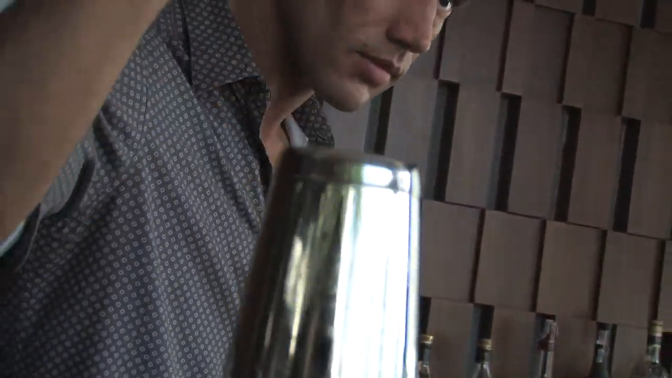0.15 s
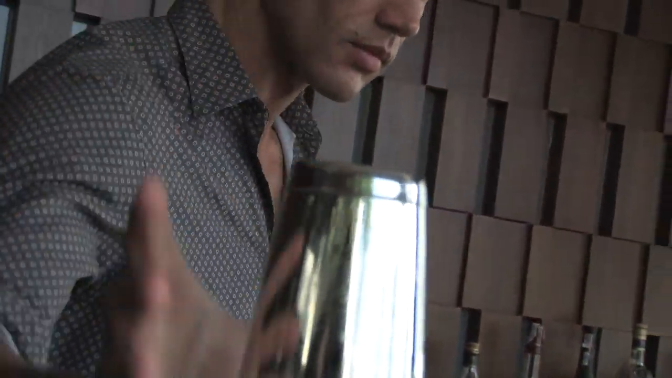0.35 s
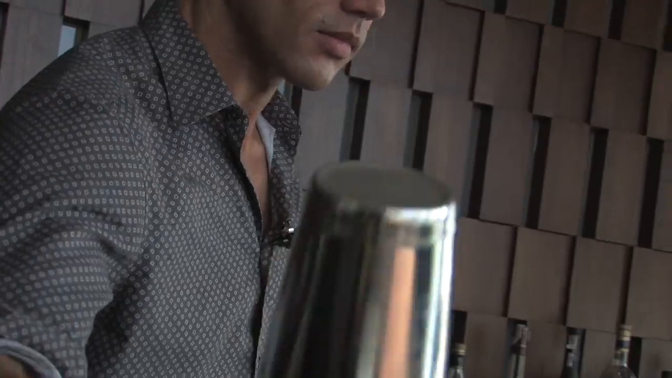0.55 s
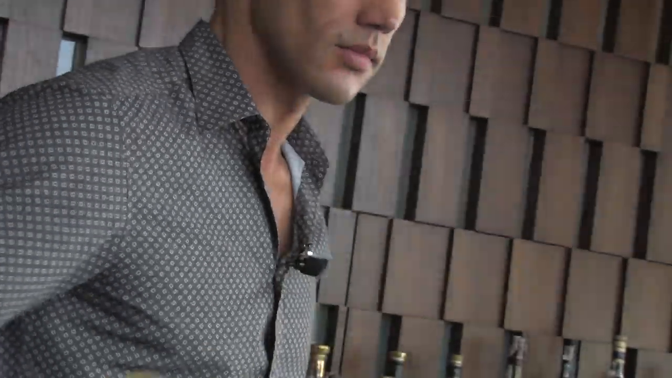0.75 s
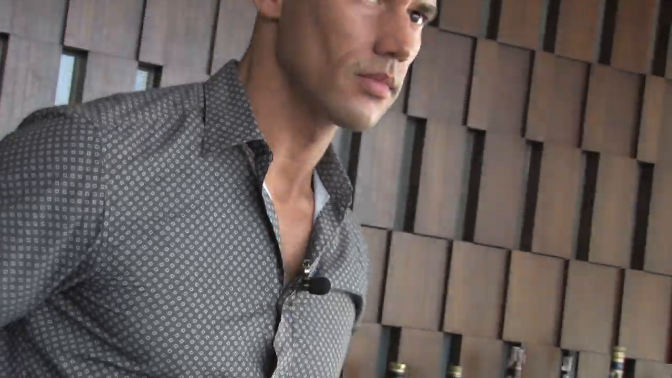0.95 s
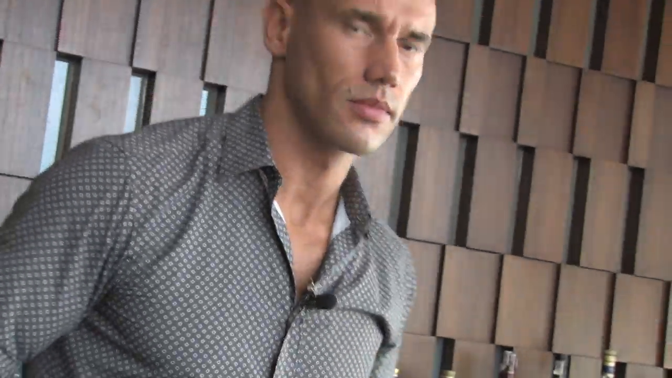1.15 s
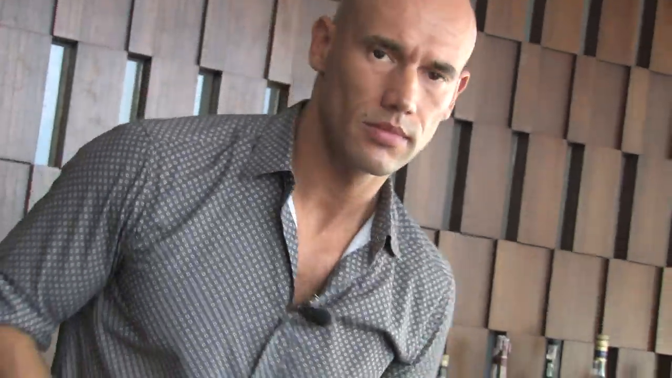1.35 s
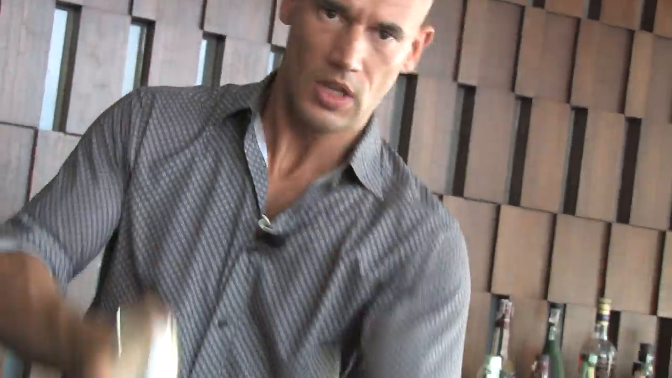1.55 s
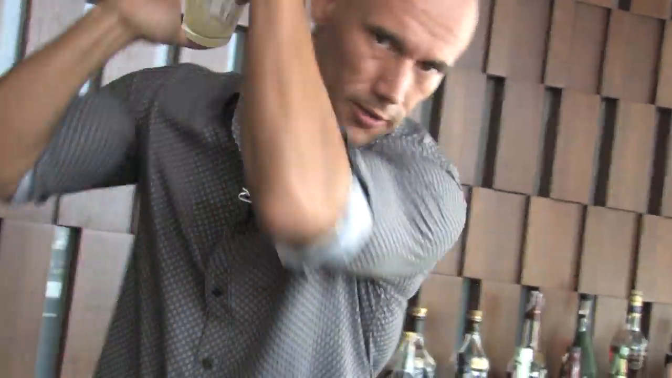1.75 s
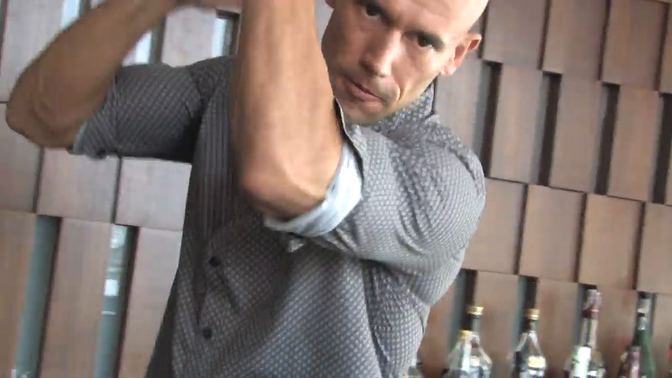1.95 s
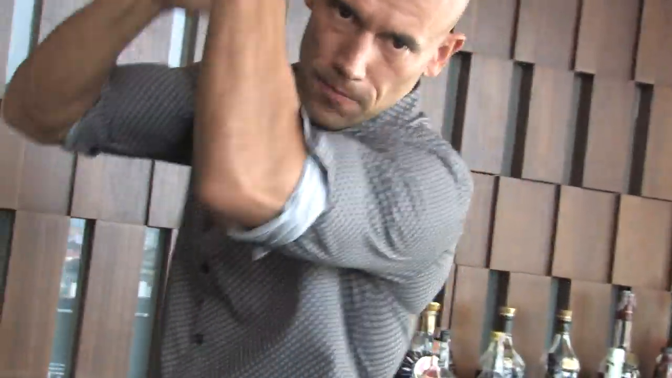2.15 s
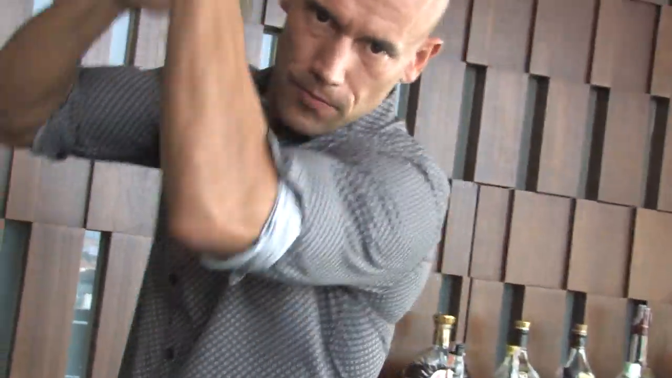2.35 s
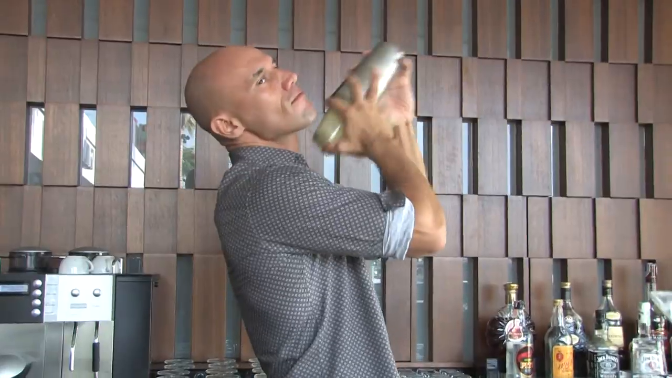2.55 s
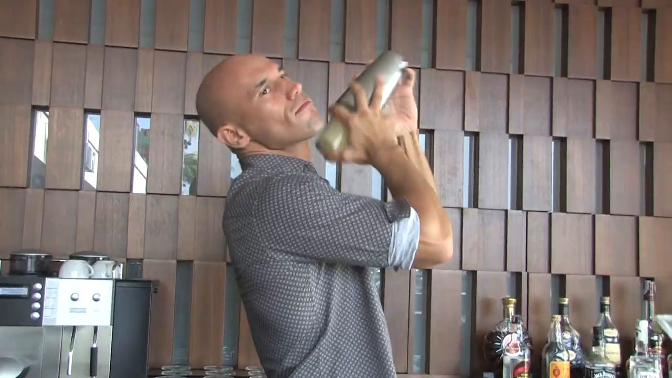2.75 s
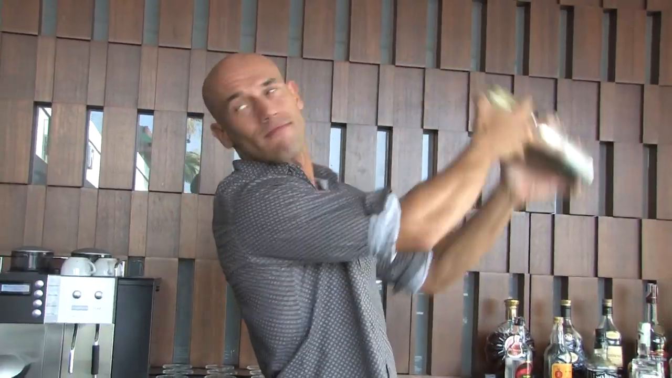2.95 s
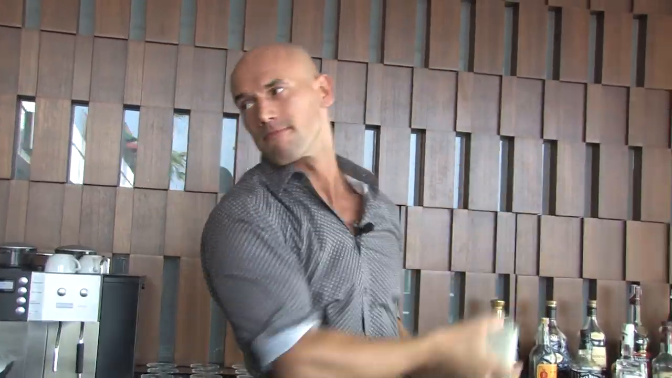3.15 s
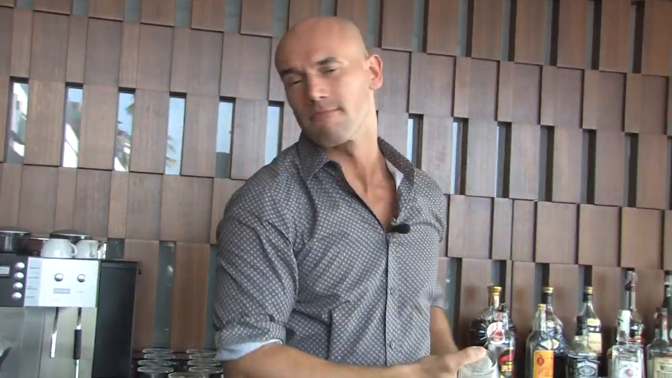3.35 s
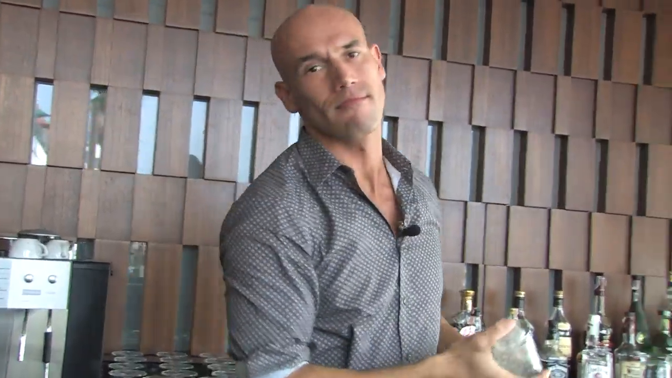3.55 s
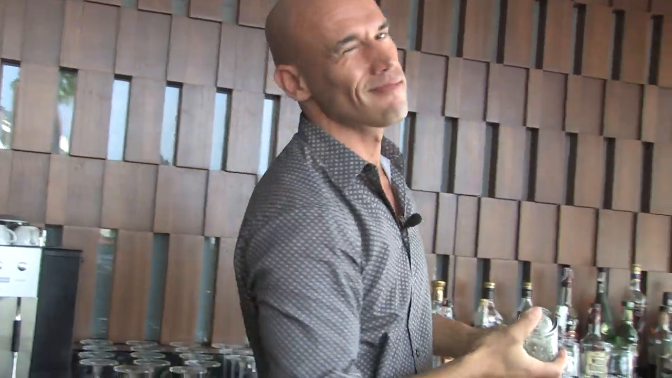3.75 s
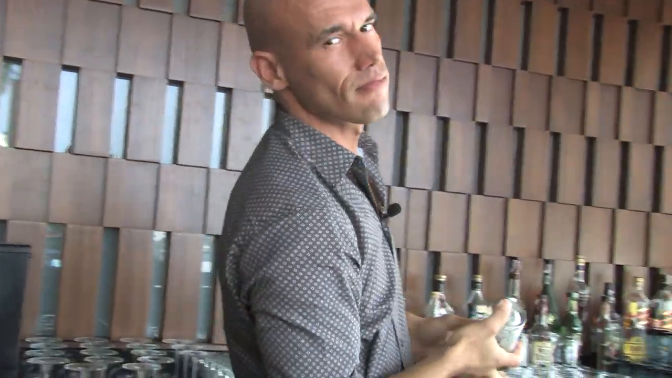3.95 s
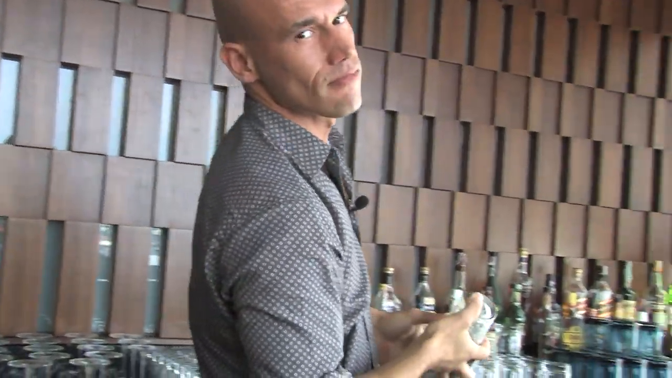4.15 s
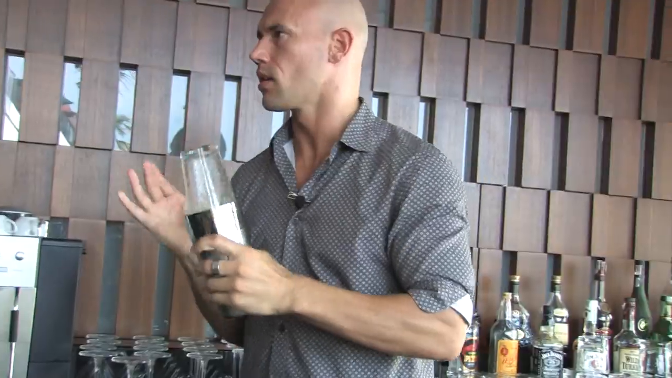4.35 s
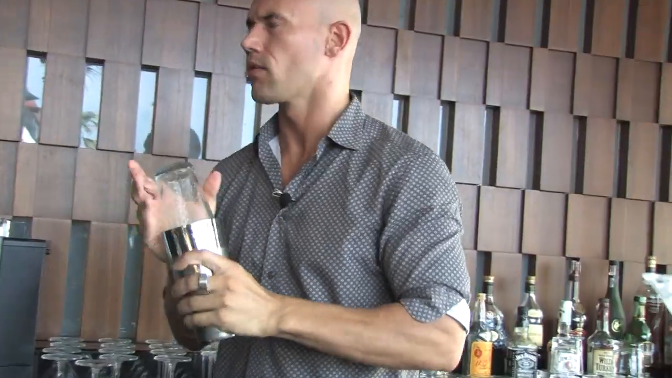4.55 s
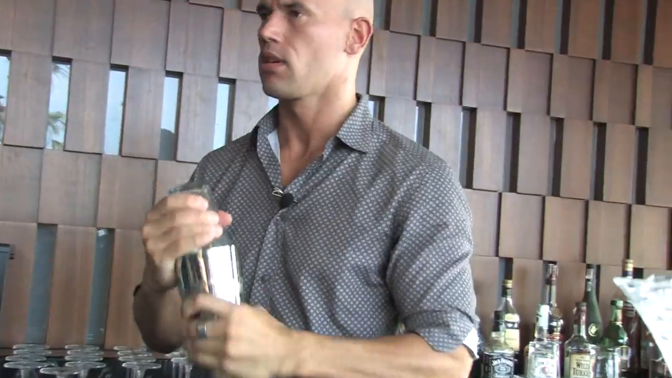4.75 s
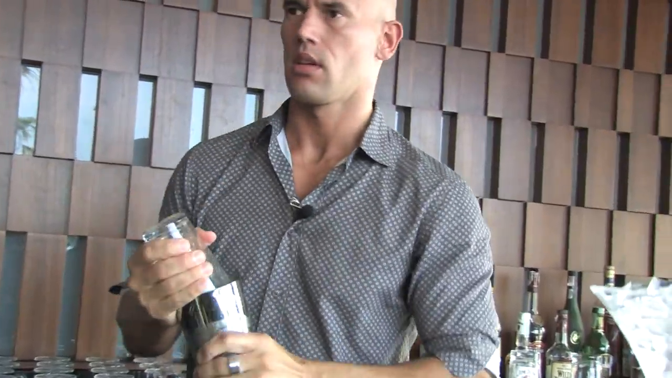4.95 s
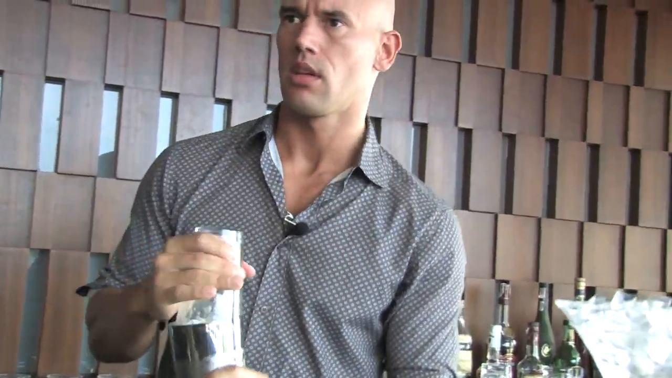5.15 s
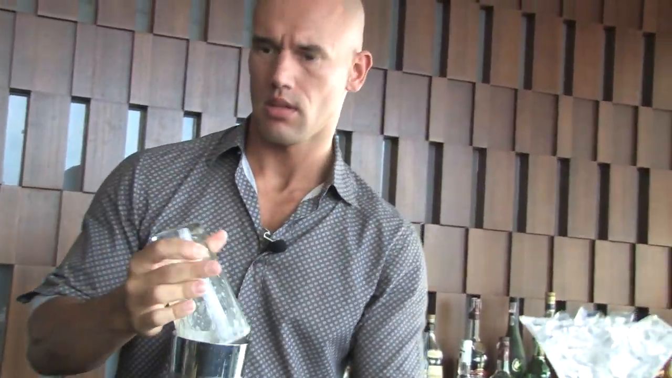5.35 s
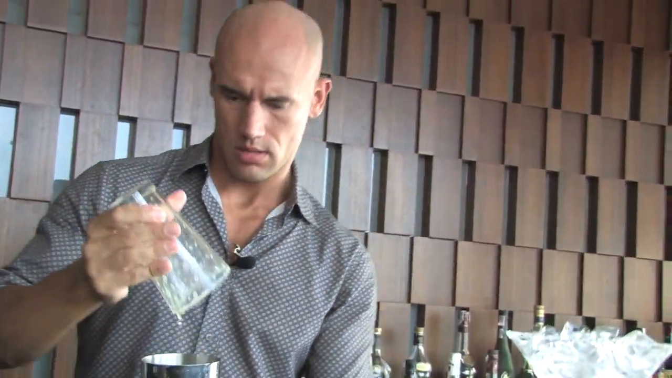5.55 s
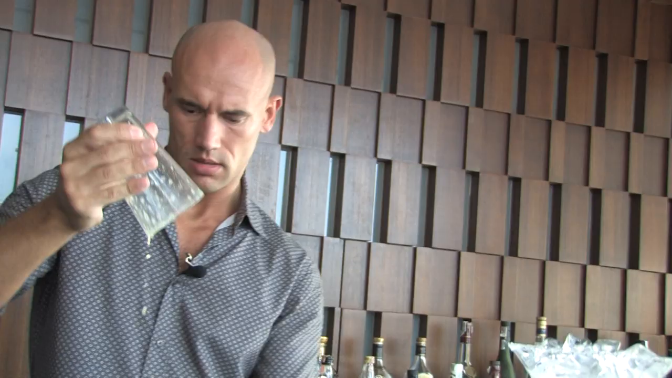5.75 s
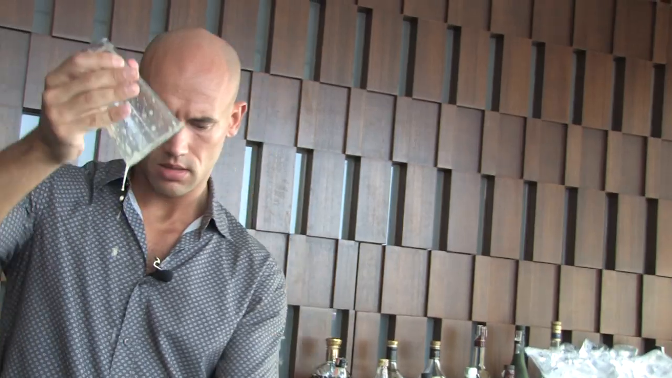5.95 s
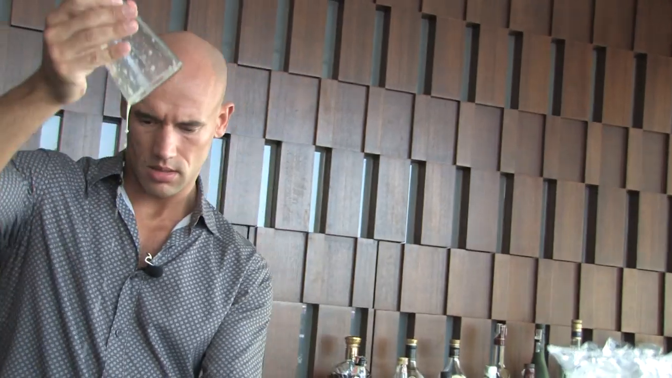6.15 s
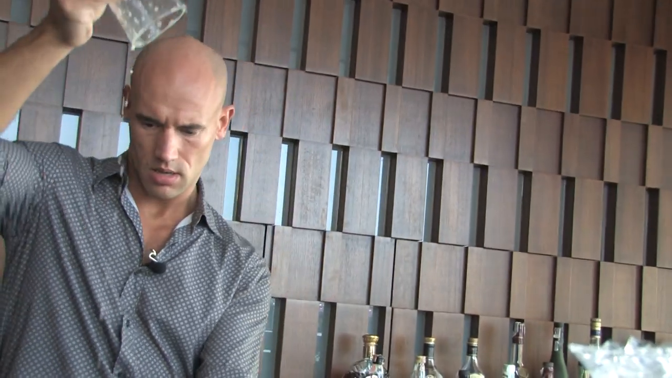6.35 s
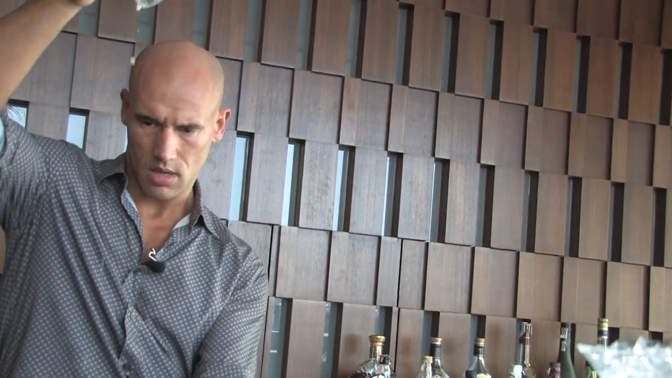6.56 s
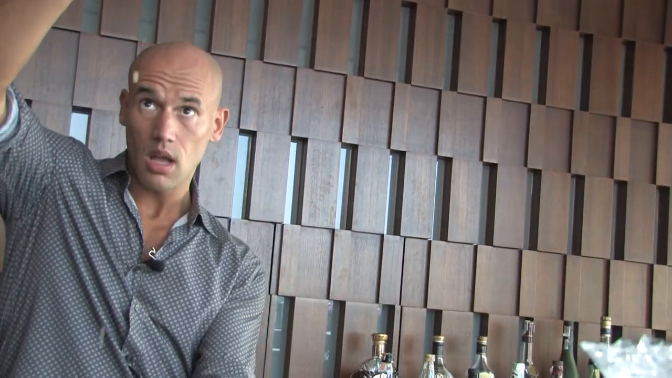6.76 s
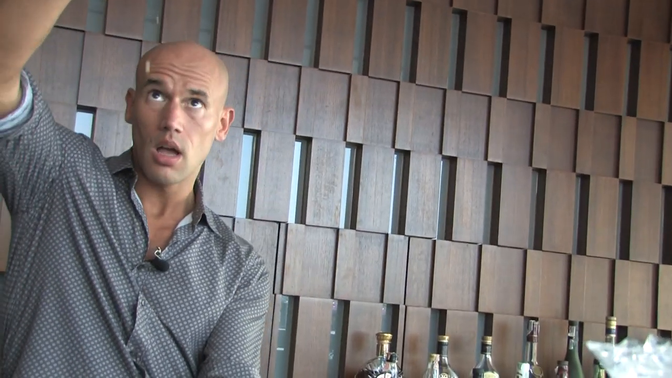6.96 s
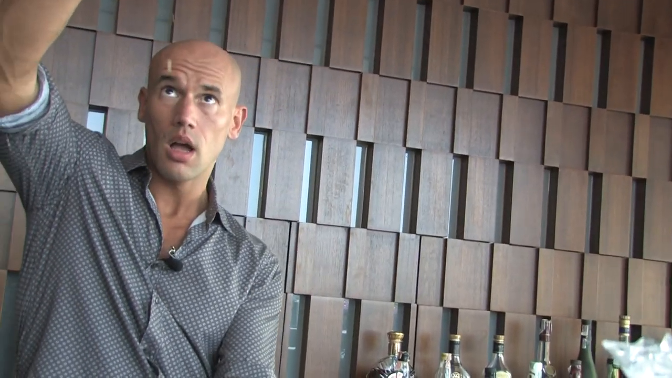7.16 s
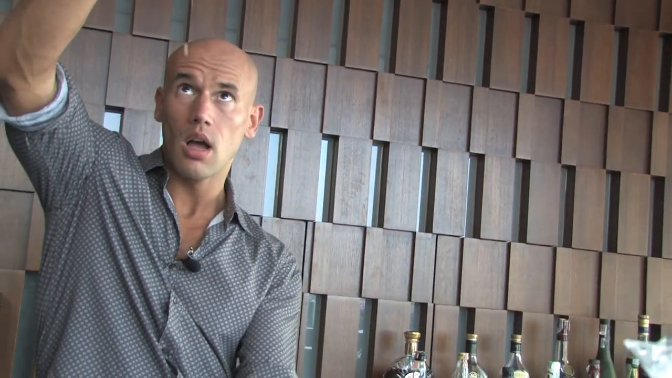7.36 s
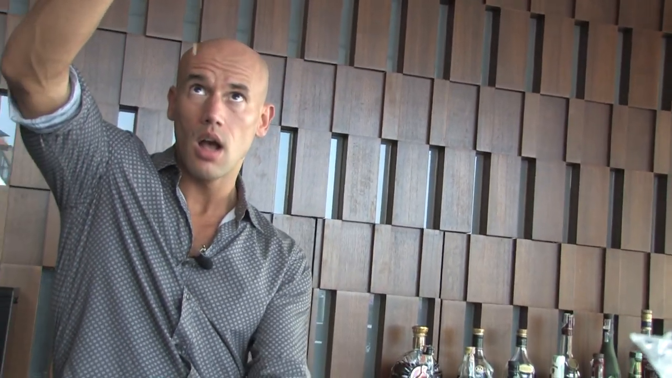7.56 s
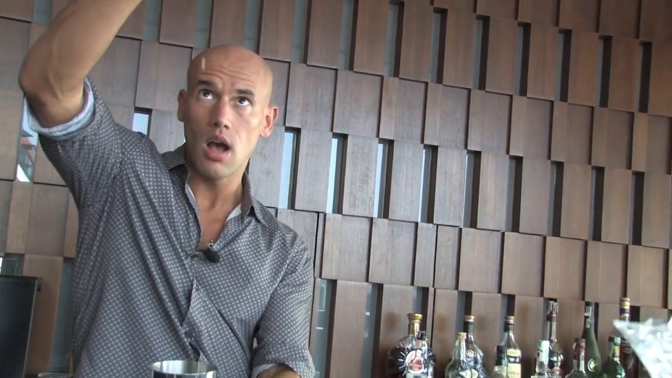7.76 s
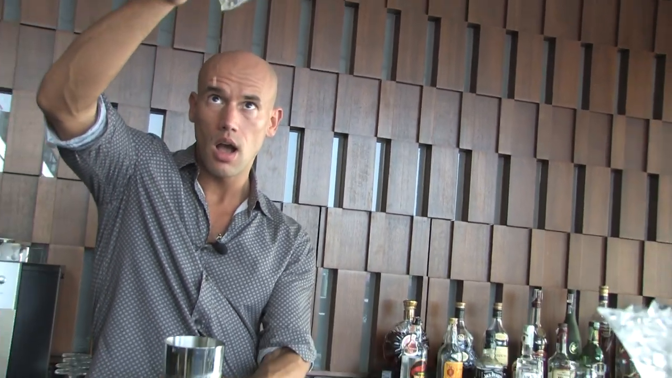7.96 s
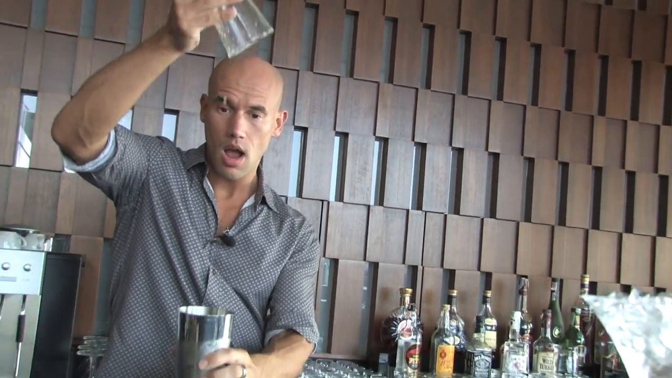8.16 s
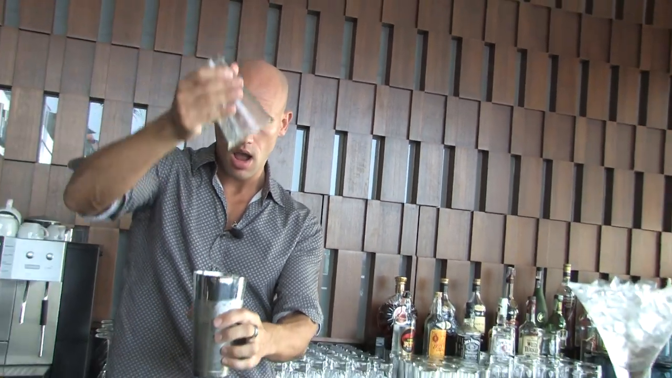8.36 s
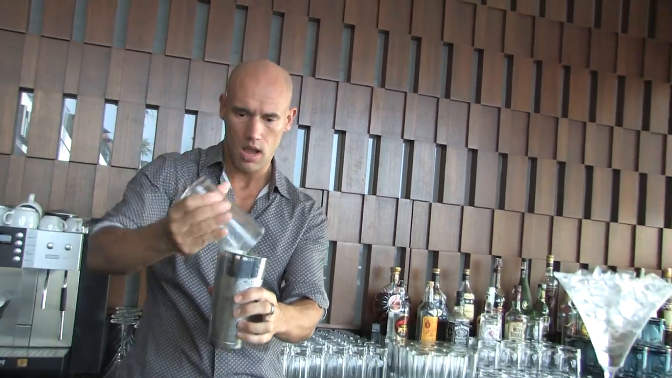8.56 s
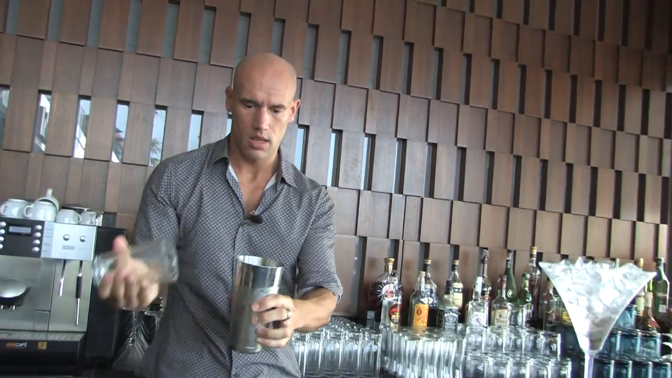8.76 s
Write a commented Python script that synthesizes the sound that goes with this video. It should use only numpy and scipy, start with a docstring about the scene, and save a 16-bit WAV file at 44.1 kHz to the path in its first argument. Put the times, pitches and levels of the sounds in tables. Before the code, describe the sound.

Ringing slap on a shaker, a swish of ice, a few tumbling cubes and clicks, then about a dozen rapid ice strokes with low cloth bumps at the microphone. Midway everything turns quieter and duller. A distorted blow opens the seal, bits of ice tick on steel, a thin pour fades in the short-echo bar, and a glass lands hard on wood.

```python
"""Bar counter, microphone on the shirt, steel shaker close by: a bartender slaps a glass into a tin,
shakes the ice, knocks the seal open and pours; the glass clinks on the tin and is set down hard.
Ice is streams of short noise cracks and steel modes; slaps, snaps and clinks are noise and dying modes;
the pour is bubble tones. Cloth bumps and rumble, bar hiss, faint whistles and a short room lie behind.
One stretch is suddenly softer and duller; the loudest blows overload the microphone input."""
import sys
import numpy as np
from scipy import signal
from scipy.fft import rfft, irfft
from scipy.io import wavfile
from scipy.ndimage import uniform_filter1d

SR = 44100
rng = np.random.default_rng(int(sys.argv[2]) if len(sys.argv) > 2 else 0)


def output_pcm(signal):
    """Save a mono or channel-first signal as 16-bit PCM at the path in sys.argv[1].

    Samples are clipped to [-1, 1] before scaling.
    """
    pcm = np.clip(np.atleast_2d(signal).T, -1, 1) * 32767
    wavfile.write(sys.argv[1], SR, np.round(pcm).astype(np.int16))


N = 392116
TIME = np.arange(N) / SR  # seconds into the scene
AGE = np.arange(SR // 3) / SR  # seconds since a contact

# Event levels hold ahead of the quiet stretch and the overload; mode and colour levels are relative.

# steady bar hiss: pitch_hz, level_db (per Hz)
HISS_COLOUR = [(15, -30.5), (25, -9.5), (48, -6.5), (149, 0.5), (317, -8.5), (560, -7.5), (1400, -14),
               (2610, -16), (3820, -20.5), (7710, -21), (14800, -24), (16000, -25)]
HISS_DB = -49.5
# how long the room rings: pitch_hz, t60_s
ROOM_T60 = [(200, 0.063), (3000, 0.44), (8000, 0.39), (16000, 0.2)]
# faint thin whistles: start_s, length_s, start_hz, end_hz, level_db
WHISTLES = [(0.08, 0.13, 9300, 8900, -44.5), (1.501, 0.13, 9400, 8100, -43), (5.08, 0.23, 1050, 995, -49),
            (5.386, 0.2, 1120, 926, -52), (5.67, 0.176, 790, 775, -53.5), (6.22, 0.43, 3560, 3490, -55),
            (6.37, 0.16, 3190, 3160, -51)]

# microphone bumps on the shirt: start_s, peak_db, pitch_hz, time_to_peak_s
BUMPS = [(.008, -22, 208, 0.0071), (0.856, -27, 73, 0.0086), (1.213, -29, 117, 0.013),
         (1.648, -21.5, 64.5, 0.0066), (1.848, -21, 93, 0.0073), (1.9699, -7, 157, 0.0016),
         (1.973, -4.5, 68.8, 0.0055), (2.022, -16, 62.6, 0.017), (2.19, -15.5, 67.4, .012),
         (2.416, -9, 67.6, 0.0057), (4.585, -1, 125, 0.0042), (5.805, -24, 38.8, .011),
         (5.916, -23.5, 171, 0.00086), (5.993, -24.5, 150, 0.0018), (6.661, -26, 77.8, 0.0075),
         (6.939, -27, 86, 0.015)]
# arm moves dragging cloth over the microphone: peak_s, level_db, rise_s, t60_s
MOVES = [(.02, -28.5, 0.59, 0.53), (.9, -40, 0.33, 0.44), (1.35, -40.5, 1.9, 1.7), (2.0, -24.5, 1.15, 1.87),
         (3.3, -31, .9, 0.63), (4.54, -36.5, 0.23, 0.48), (6.95, -52, 4.1, 0.56), (8.6, -53.5, 1.1, 4)]
# cloth rumble: pitch_hz, level_db (per Hz)
RUMBLE_COLOUR = [(15, -15), (45, 1.5), (90, -3.5), (180, -14), (400, -23.5), (1000, -43), (4000, -86.5)]
CLOTH_REST_DB = -62  # the shirt is never quite still

# the drink gulps as the shaker is jolted or turned over: peak_s, level_db
GULPS = [(0.153, -42), (1.036, -31), (1.054, -29.5), (1.109, -29.5), (1.15, -34.5)]
# air pocket in the shaker: pitch_hz, width_hz, level_db
AIR_POCKET = [(460, 130, -8), (600, 75, 0), (910, 160, -11), (1550, 600, -15)]
# drink splashing on the wall: pitch_hz, level_db (per Hz)
SPLASH_COLOUR = [(150, -27), (400, -13), (750, -4), (1200, -1), (1650, 2), (2100, -3), (3000, -14),
                 (16000, -50)]
GULP_RISE_S, GULP_T60, GULP_SPLASH_DB, SPRAY_RISE_S = .008, .3, -6, .13
# the drink runs into the tin: a first gush that thins to a trickle
POUR_S, POUR_DB, POUR_RISE_S, POUR_T60 = 5.68, -57, 1.2, 3

# the glass is struck: start_s, level_db, favoured_hz, tick_db
CLINKS = [(5.3793, -26, 2820, -26), (5.3909, -22, 4830, -22.5), (8.7238, -4.5, 2300, -9.5),
          (8.7402, -40, 2500, -17), (8.83, -28.5, 4970, -33.5)]
# mixing glass modes: pitch_hz, level_db, t60_s
GLASS_MODES = [(2229, -8, .05), (2313, -3, .082), (5005, -8, .085), (6200, -6, .035), (7060, -13, .07),
               (8390, 4.5, .036)]
# wooden counter modes under the glass: pitch_hz, level_db, t60_s
COUNTER_MODES = [(296, -11, .07), (540, -1, .06), (565, -31, .25), (595, -9, .058), (820, -19, .07),
                 (1180, -19, .03), (1670, -19, .045)]
KNOCK_S = 8.7245
WOBBLE_S, WOBBLE_DB, WOBBLE_RISE_S, WOBBLE_T60 = 8.838, -42, 0.049, .55

# the rim snaps in its seat: start_s, level_db, centre_hz, t60_s, rim_ring_db (relative to level_db)
SNAPS = [(1.199, -7, 4570, 0.0096, -7.5), (1.362, -15, 6800, 0.022, -22), (4.412, -27.5, 4500, 0.046, -13),
         (4.421, -28.5, 2640, .01, 4), (4.574, -19.5, 5000, 0.0096, -7.5), (4.585, -6, 7200, .0074, -31),
         (4.923, -9, 2740, 0.009, -1), (4.9484, -19, 3250, 0.0083, -20), (4.979, -28, 2950, 0.035, 0.5),
         (5.084, -18, 2760, 0.029, 5.5)]
# rim pinched by the glass: pitch_hz, level_db, t60_s
RIM_MODES = [(1390, -8, .03), (2230, -1, .018), (2420, 0, .02), (3250, -3, .016)]

# the palm strikes the shaker: start_s, level_db, crash_t60_s, ring_db, spared_hz (not boosted)
SLAPS = [(.007, -12.5, 0.058, -20.5, 2540), (.022, -19, 0.23, -22, 2100), (4.591, 0.5, 0.053, -31.5, 3700)]
# crash of a slap: pitch_hz, level_db (per Hz)
CRASH_COLOUR = [(80, -11.5), (300, 1), (800, -3), (1500, -5.5), (2600, 6), (3600, 1), (4600, -6),
                (7200, -3), (10500, -12), (13000, -29), (16000, -32)]
# tin ringing freely: pitch_hz, level_db, t60_s
TIN_MODES = [(2042, -4, .42), (2525, -9, .2), (2620, 10, .026), (2690, -8, .2), (3510, -12, .28),
             (4550, -18, .3), (5740, -18, .42), (6330, -17, .2), (6915, -13, .24), (10840, -18, .11)]

# rushing ice: pitch_hz, level_db (per Hz)
RUSHING_COLOUR = [(410, -48.5), (700, -33.5), (1500, -22), (1780, -13.5), (2130, -5), (2880, -12),
                  (3290, 0), (3740, -12.5), (4260, -10), (5470, -17), (7390, -12), (16000, -44)]
# crushed ice pours from one end to the other as the shaker is turned over
RUSH_S, RUSH_HOLD_S, RUSH_DB, RUSH_RISE_S, RUSH_T60 = 0.84, 0.046, -22, 0.1, 0.41
# stray bits run ahead of it and trail behind; level relative to the rush
STRAGGLE_DB, STRAGGLE_RISE_S, STRAGGLE_T60 = -13, 0.45, 1.1
# the last cubes settle in ticks that die down to a faint remainder
SETTLE_S, SETTLE_DB, SETTLE_RISE_S, SETTLE_T60, LAST_TICKS_DB = 3.45, -34, 0.53, 0.32, -57
# ice slides along the tin as the glass is worked loose and lifted: peak_s, level_db, rise_s, t60_s
SLIDES = [(4.415, -35, 0.043, 0.41), (4.47, -40.5, .1, 0.16), (4.6, -10.5, 0.073, 0.194),
          (4.68, -43, .3, 0.63), (4.895, -35, 0.32, 0.27), (5.09, -39, 0.22, 0.23),
          (5.152, -36, 0.22, 0.23)]
# ice sliding on steel: pitch_hz, level_db (per Hz)
SLIDING_COLOUR = [(350, -35.5), (670, -24.5), (1200, -9.5), (1830, 4.5), (2310, 6.5), (3680, -6),
                  (4650, -11), (6200, -0.5), (12000, -19.5), (16000, -34.5)]
# bits of ice drop in the opened tin: start_s, peak_db, favoured_hz
BITS = [(4.433, -25, 3400), (4.557, -22.5, 3300), (4.7915, -26, 2500), (4.8752, -29, 3150),
        (5.035, -27.5, 2450), (5.0706, -21, 2140), (5.1304, -24, 3210), (5.1536, -20, 3070),
        (5.2962, -30, 3400)]
# steel wall under a light tick: pitch_hz, level_db, t60_s
WALL_MODES = [(2400, -2, .013), (3050, -1, .011), (3450, 2, .012), (3840, -5, .008), (4575, -4, .012),
              (7500, -12, .008)]

# a few cubes tumble as the shaker is turned and raised: peak_s, level_db
TUMBLES = [(1.135, -29.5), (1.207, -21.5), (1.25, -31), (1.304, -30.5), (1.374, -28.5), (1.578, -39.5),
           (1.84, -38.5), (1.86, -33.5), (1.9, -22)]
TUMBLE_RISE_S, TUMBLE_T60 = .09, 0.33
TUMBLE_CUBES_DB, TUMBLE_CHIPS_DB, TUMBLE_SPLASH_DB = -5, -7, -12  # what a tumble is made of
# the ice hits an end of the shaker:
# middle_s, cubes_db, spread_s (standard deviation), splash_db, chips_db, cubes_lower_edge_hz
STROKES = [(1.962, -11, 0.027, -25, -29, 800), (2.061, -6.5, 0.017, -19.5, -16.5, 450),
           (2.149, -11, 0.028, -24, -23.5, 1000), (2.255, -8.5, 0.022, -21.5, -26, 550),
           (2.329, -11.5, 0.011, -22.5, -23, 695), (2.373, -8.5, 0.013, -26.5, -19.5, 1200),
           (2.454, -11, 0.02, -19, -18.5, 449), (2.534, -15, 0.0084, -30.5, -22.5, 800),
           (2.617, -14.5, 0.023, -39, -27, 800), (2.728, -15, 0.029, -36, -22, 1500),
           (2.849, -18, 0.024, -32.5, -42, 600), (2.966, -11, 0.019, -42, -17, 2000),
           (3.058, -16, 0.012, -46, -31, 1500), (3.125, -22.5, 0.036, -38.5, -31, 900)]
# single cubes on the wall: start_s, peak_db, favoured_hz
CLACKS = [(1.3788, -13, 3500), (1.436, -22, 4500), (1.6732, -24, 3740), (1.8718, -20, 4500),
          (1.8923, -11, 3520), (1.929, -6, 3440), (1.958, 5.5, 3400), (2.026, -3, 3400),
          (2.0926, 1.5, 3490), (2.1445, 2, 4630), (2.1655, 6, 3400), (2.174, 0.5, 7400), (2.218, -4, 3420),
          (2.267, 3, 3483), (2.2946, -5.5, 2400), (2.3193, 7, 7430), (2.3411, 3, 7560), (2.3483, 3.5, 4630),
          (2.3565, 7, 6500), (2.383, 1, 7420), (2.4064, -3.5, 3370), (2.4385, -3, 3400),
          (2.4458, 3.5, 6550), (2.5008, -4.5, 4470), (2.513, -3, 3400), (2.529, -4, 3500),
          (2.581, -7, 3500), (2.6125, -4, 3320), (2.684, -3, 4600), (2.7072, -2, 3120), (2.7267, -2, 4420),
          (2.9291, -4, 3400), (3.0445, -6, 3320), (3.077, -7, 6500), (3.107, -3, 3200), (3.216, -12, 3340),
          (3.2736, -18, 3200), (3.2937, -15, 3000), (3.3446, -14, 3260), (3.3842, -20.5, 4600),
          (3.4283, -20, 3460), (3.4998, -20, 3430), (3.523, -25, 3500)]
# closed shaker, damped by the hands: pitch_hz, level_db, t60_s (single clacks die faster still)
SHAKER_MODES = [(2158, -2.5, 0.018), (2600, -9.5, 0.024), (3210, -5, .022), (3327, -2.5, 0.034),
                (3460, -3.5, 0.025), (3573, -3, 0.028), (4300, -10, 0.017), (4616, -6, .026),
                (6660, -9.5, 0.022), (7406, -6, 0.02), (7560, -5.5, 0.02), (7724, -5.5, 0.02)]
# bare contact of ice: pitch_hz, level_db (per Hz)
CONTACT_COLOUR = [(100, -35), (500, -27), (1500, -6), (2000, 3), (2800, -2.5), (3450, 4), (4600, 1),
                  (5300, -5), (7600, 4), (8800, -3), (11000, -8), (12500, -19), (16000, -29)]
# small chips spraying on the wall: pitch_hz, level_db (per Hz)
CHIPS_COLOUR = [(1000, -36), (4050, -8), (4650, 3), (5400, -5), (6700, 1), (7700, -2), (8700, -12),
                (11000, -15), (16000, -44)]
# between strokes the cubes keep jostling; the jostle builds fast and runs down slowly
SHAKE_FROM, SHAKE_TO, JOSTLE_DB, JOSTLE_RISE_S, JOSTLE_T60 = 1.915, 3.13, -27.5, .28, 0.9
# light contacts carry some chips and no bass
JOSTLE_CHIPS_DB, JOSTLE_EDGE_HZ = -7, 1550

# everything is softer in this stretch, and the shaker duller
QUIET_FROM, QUIET_TO, QUIET_DB, QUIET_EDGE_HZ = 2.543, 4.410, -13, 12000
EDGE_HZ = 16000  # upper band limit


def amp(db):
    """Decibels to gain."""
    return 10 ** (np.asarray(db) / 20)


def unit(x):
    """Scales to rms 1."""
    return x / np.sqrt(np.mean(x ** 2) + 1e-20)


def read(points, hz):
    """Joins rows (pitch_hz, value) on a log-frequency axis."""
    f, value = np.transpose(points)
    return np.interp(np.log(hz + 1), np.log(f + 1), value)


def add(mix, s, sound):
    """Lays a sound into the mix at time s."""
    part = mix[max(round(s * SR), 0):][:len(sound)]
    part += sound[:len(part)]


def fade(t60):
    """Free decay of a struck thing, 60 dB in t60 seconds."""
    return amp(-60 * AGE / t60)


def swell(s, db, rise, t60, hold=0):
    """Gain over time: climbs 60 dB in the rise time up to s, holds, then dies away."""
    under = np.maximum(s - TIME, 0) / rise + np.maximum(TIME - s - hold, 0) / t60
    return amp(db - 60 * np.minimum(under, 4))


def swells(rows):
    """Joint gain of independent swells (peak_s, level_db, rise_s, t60_s)."""
    return np.sqrt(sum(swell(*row) ** 2 for row in rows))


def above(x, edge_hz):
    """Thins out everything below the edge, steeply."""
    return signal.sosfiltfilt(signal.butter(2, edge_hz, "highpass", fs=SR, output="sos"), x, padtype=None)


def below(x, edge_hz):
    """Dulls everything above the edge."""
    return signal.sosfilt(signal.butter(3, edge_hz, fs=SR, output="sos"), x)


def noise(colour, size):
    """Noise of rms 1 with the given colour."""
    hz = np.fft.rfftfreq(size, 1 / SR)
    white = rng.standard_normal(size)
    return unit(irfft(rfft(white) * amp(read(colour, hz)), size))


def hollow(modes):
    """Noise of rms 1 in a few broad resonances (pitch_hz, width_hz, level_db)."""
    hz = np.fft.rfftfreq(N, 1 / SR)
    gain = sum(amp(db) / (1 + (2 * (hz - f) / width) ** 2) for f, width, db in modes)
    return unit(irfft(rfft(rng.standard_normal(N)) * gain, N))


def favour(modes, favoured_hz, slope_db):
    """Tilts the mode levels: slope_db weaker per octave away from one pitch."""
    return [(hz, db - slope_db * abs(np.log2(hz / favoured_hz)), t60) for hz, db, t60 in modes]


def ring(modes, spread_db=0, detune=0):
    """Dying modes of random sign; strength and, slightly, pitch can vary at random."""
    chance = rng.uniform(-0.84, 1, (len(modes), 3))
    out = np.zeros(len(AGE))
    for (hz, db, t60), (side, strength, shift) in zip(modes, chance):
        tone = np.sin(2 * np.pi * hz * (1 + detune * shift) * AGE)
        out += np.sign(side) * amp(db + spread_db * strength) * fade(t60) * tone
    return out


def patter(grains, per_s, spread_db, size=N):
    """A random stream of rms 1: grains of uneven level at random moments, each at most 50 ms."""
    out = np.zeros(size)
    draws = np.random.default_rng(rng.integers(2 ** 31)).random((round(per_s * size / SR), 3))
    for when, weak, which in draws:
        grain = grains[int(which * len(grains))][:SR // 20]
        add(out, when * size / SR, amp(-spread_db * weak) * grain)
    return unit(out)


def puffs(colour, t60, count):
    """Short dying bursts of coloured noise, the grains of a stream."""
    return [noise(colour, len(AGE)) * fade(t60) for _ in range(count)]


def bar_hiss():
    """The far background of the bar: steady coloured noise."""
    return amp(HISS_DB) * noise(HISS_COLOUR, N)


def room(x):
    """A diffuse tail from the panelled walls: the bass dies first, the middle lingers longest."""
    hz, t, z = signal.stft(rng.standard_normal(SR // 2), SR, nperseg=256)
    decay = amp(-60 * t / read(ROOM_T60, hz)[:, None])
    tail = signal.istft(z * decay, SR, nperseg=256)[1]
    tail[:SR // 200] = 0  # nothing comes back in the first 5 ms
    return signal.fftconvolve(x, tail / np.linalg.norm(tail))[:N]


def whistles():
    """Faint blurred tones that flutter and glide a little; the higher ones are fuzzier."""
    out = np.zeros(N)
    for s, length, start_hz, end_hz, db in WHISTLES:
        size = round(length * SR)
        waver = unit(uniform_filter1d(rng.standard_normal(size), size=24))
        flutter = 1 + .5 * unit(uniform_filter1d(rng.standard_normal(size), size=800))
        hz = np.linspace(start_hz, end_hz, size) * (1 + 0.033 * start_hz / 9000 * waver)
        tone = np.sin(2 * np.pi * np.cumsum(hz) / SR)
        add(out, s, amp(db) * signal.windows.tukey(size, .8) * flutter * tone)
    return out


def shirt():
    """Handling at the microphone: cloth rumble, and bumps as low tones that swell and die."""
    out = (swells(MOVES) + amp(CLOTH_REST_DB)) * noise(RUMBLE_COLOUR, N)
    for s, db, hz, to_peak in BUMPS:
        push = (AGE / to_peak) ** 2 * np.exp(2 * (1 - AGE / to_peak))
        add(out, s, -amp(db) * push * np.sin(2 * np.pi * hz * AGE))
    return out


def gulp():
    """Sloshing drink washes up the wall, then stirs the air pocket in the shaker."""
    slosh = swells((s, db, GULP_RISE_S, GULP_T60) for s, db in GULPS)
    wash = swells((s, db + GULP_SPLASH_DB, SPRAY_RISE_S, GULP_T60) for s, db in GULPS)
    spray = patter(puffs(SPLASH_COLOUR, t60=.012, count=12), per_s=900, spread_db=16)
    return slosh * hollow(AIR_POCKET) + wash * spray


def pour():
    """The thin stream traps small bubbles, each ringing at its own pitch."""
    bubbles = [np.sin(2 * np.pi * hz * AGE) * fade(.04) for hz in np.geomspace(650, 1300, num=20)]
    stream = patter(bubbles, per_s=220, spread_db=20.5)
    return swell(POUR_S, POUR_DB, POUR_RISE_S, POUR_T60) * stream


def glass():
    """Struck glass modes and ticks, the counter's wooden knock, and hollow noise for the wobble."""
    wobble = hollow([(764, 120, 0), (550, 60, -2)])
    out = swell(WOBBLE_S, WOBBLE_DB, WOBBLE_RISE_S, WOBBLE_T60) * wobble
    tick_colour = [(200, -25), (1800, 10.0), (4000, 2.5), (8500, 3.5), (11000, -3.5), (16000, -32)]
    for s, db, hz, tick_db in CLINKS:
        tick = noise(tick_colour, len(AGE)) * fade(0.035)
        clink = ring(favour(GLASS_MODES, hz, slope_db=7.0))
        add(out, s, amp(db) * clink + amp(tick_db) * tick)
    add(out, KNOCK_S, ring(COUNTER_MODES) * (1 - fade(0.025)))  # soft onset
    return out


def snaps():
    """Glass slips on steel in dry clicks that ring the rim briefly."""
    out = np.zeros(N)
    for s, db, hz, t60, rim_db in SNAPS:
        colour = [(hz / 12, -26), (hz / 1.35, -9), (hz, 0), (hz * 1.6, -8), (16000, -30)]
        # a fast click over a faint slower tail
        crack = noise(colour, len(AGE)) * (fade(t60) + amp(-31.0) * fade(0.065))
        add(out, s, amp(db) * (crack + amp(rim_db) * ring(RIM_MODES)))
    return out


def slaps():
    """The palm jolts all the ice at once, a noise crash, and sets the tin ringing."""
    out = np.zeros(N)
    for s, db, t60, ring_db, spared_hz in SLAPS:
        crash = noise(CRASH_COLOUR, len(AGE)) * fade(t60)
        tin = ring(favour(TIN_MODES, spared_hz, slope_db=-2))  # boosted away from this pitch
        add(out, s, amp(db) * crash + amp(ring_db) * tin)
    return out


def bit(hz):
    """A small piece of ice ticks against the steel wall: brief modes and noise, peak 1."""
    wall = ring(favour(WALL_MODES, hz, slope_db=14), spread_db=5, detune=.06)
    tick = wall + amp(-7.5) * noise(SLIDING_COLOUR, len(AGE)) * fade(.014)
    return tick / abs(tick).max()


def tumbling():
    """Gain over time of the ice that tumbles while the shaker is turned."""
    return swells((s, db, TUMBLE_RISE_S, TUMBLE_T60) for s, db in TUMBLES)


def loose_ice():
    """Crushed ice rushes through the shaker, settles in ticks, and slides and clinks along the tin."""
    rush = patter(puffs(RUSHING_COLOUR, t60=0.1, count=20), per_s=3900, spread_db=27.5)
    ticks = patter([bit(hz) for hz in np.linspace(3400, 4800, num=20)], per_s=380, spread_db=20)
    scrapes = [noise(SLIDING_COLOUR, len(AGE)) * fade(.013) + 3 * bit(hz)
               for hz in np.linspace(2500, 3800, num=24)]
    slide = patter(scrapes, per_s=1100, spread_db=24)

    bulk = swell(RUSH_S, RUSH_DB, RUSH_RISE_S, RUSH_T60, hold=RUSH_HOLD_S)
    strays = swell(RUSH_S + RUSH_HOLD_S, RUSH_DB + STRAGGLE_DB, STRAGGLE_RISE_S, STRAGGLE_T60)
    settling = swell(SETTLE_S, SETTLE_DB, SETTLE_RISE_S, SETTLE_T60)
    remainder = swell(SETTLE_S, LAST_TICKS_DB, SETTLE_RISE_S, t60=1.4, hold=0.67)
    sliding = swells(SLIDES) + amp(TUMBLE_CHIPS_DB) * tumbling()

    out = np.hypot(bulk, strays) * rush + (settling + remainder) * ticks + sliding * slide
    for s, db, hz in BITS:
        add(out, s, amp(db) * bit(hz))
    return out


def cube(modes, contact_db, contact_t60):
    """One cube meets the wall: a dry crack of randomly varied colour, and the shaker's short ring."""
    colour = [(hz, db + rng.uniform(-7, 7)) for hz, db in CONTACT_COLOUR]
    wall = ring(modes, spread_db=10, detune=.025)
    return wall + amp(contact_db) * noise(colour, len(AGE)) * fade(contact_t60)


def ice():
    """Crowds of cubes, chips and a splash at each stroke, a softer jostle between, and single clacks."""
    out, splash, chips = np.zeros(N), np.zeros(N), np.zeros(N)  # the last two are gains over time
    hard = np.array([cube(SHAKER_MODES, contact_db=0.0, contact_t60=0.014) for _ in range(40)])
    soft = [cube(SHAKER_MODES, contact_db=6.5, contact_t60=0.0079) for _ in range(40)]
    middle = AGE[-1] / 2
    for s, db, spread, splash_db, chips_db, edge_hz in STROKES:
        stroke = np.exp(-.5 * ((AGE - middle) / spread) ** 2)
        # each stroke draws its own random handful of cubes, and so has its own colour
        handful = rng.choice(hard, size=6, replace=False)
        crowd = patter(handful, per_s=720, spread_db=20, size=len(AGE))
        # the first and last contacts are light; only the height of the stroke reaches its lower edge
        crowd = stroke * above(crowd, edge_hz) + (1 - stroke) * above(crowd, JOSTLE_EDGE_HZ)
        add(out, s - middle, amp(db) * stroke * crowd)
        add(splash, s - middle, amp(splash_db) * stroke)
        add(chips, s - middle, amp(chips_db) * stroke)

    jostle = swell(SHAKE_FROM, JOSTLE_DB, JOSTLE_RISE_S, JOSTLE_T60, hold=SHAKE_TO - SHAKE_FROM)
    tumble = tumbling()
    rattle = patter(soft, per_s=900, spread_db=24)
    out += jostle * above(rattle, JOSTLE_EDGE_HZ) + amp(TUMBLE_CUBES_DB) * tumble * rattle
    chips += amp(JOSTLE_CHIPS_DB) * jostle
    out += chips * patter(puffs(CHIPS_COLOUR, t60=.009, count=24), per_s=1100, spread_db=24)
    splash += amp(TUMBLE_SPLASH_DB) * tumble
    out += splash * patter(puffs(SPLASH_COLOUR, t60=0.011, count=12), per_s=1200, spread_db=15.0)

    for s, db, hz in CLACKS:
        modes = favour(SHAKER_MODES, hz, slope_db=17.0)
        clack = cube(modes, contact_db=-0.5, contact_t60=0.0094) * fade(0.081)
        clack = above(below(clack, 9500), 800)
        add(out, s, amp(db) * clack / abs(clack).max())
    return out


def scene():
    """The shaker close by, a little of the room, and a sudden softer, duller stretch."""
    shaker = ice() + loose_ice() + gulp() + slaps() + snaps() + pour()
    set_down = glass()
    reflections = room(amp(-14.5) * shaker + amp(-17.5) * set_down)
    bar = reflections + bar_hiss() + whistles()
    quiet = (TIME > QUIET_FROM) & (TIME < QUIET_TO)
    shaker = np.where(quiet, below(shaker, QUIET_EDGE_HZ), shaker)
    heard = shaker + set_down + bar + shirt()
    return (heard * amp(QUIET_DB * quiet))[None]


def record(dry):
    """The microphone input clips at full scale; then the band limit."""
    clipped = np.clip(dry, -1, 1)
    lowpass = signal.firwin(401, EDGE_HZ, window=("kaiser", 8), fs=SR)
    return signal.oaconvolve(clipped, lowpass[None], "same")


dry = scene()
out = record(dry)
output_pcm(out)
```